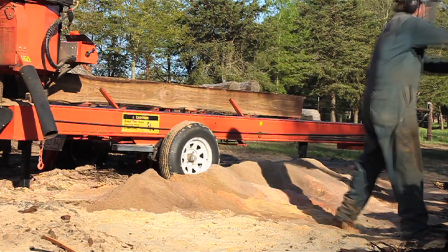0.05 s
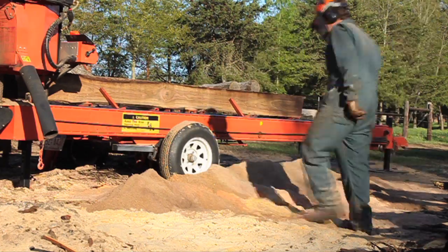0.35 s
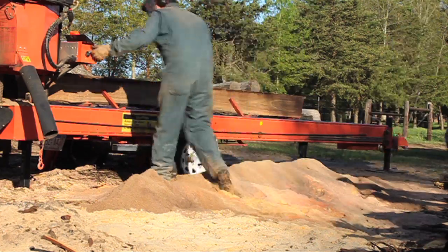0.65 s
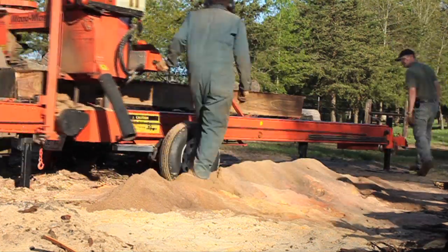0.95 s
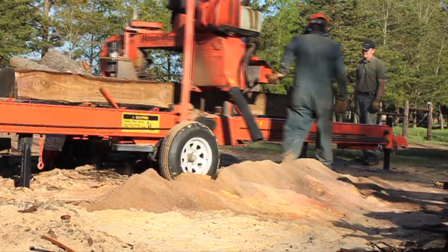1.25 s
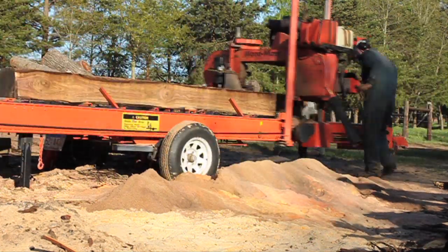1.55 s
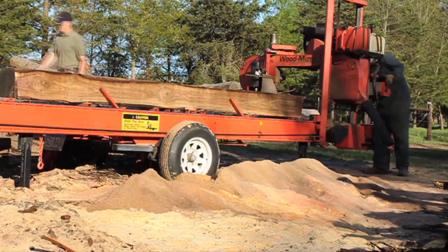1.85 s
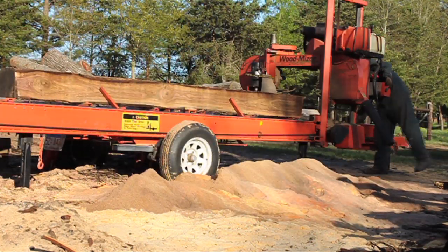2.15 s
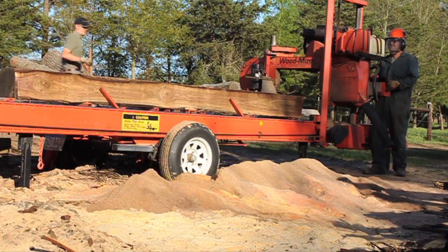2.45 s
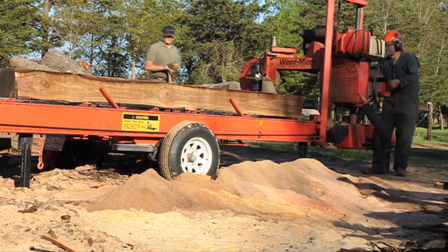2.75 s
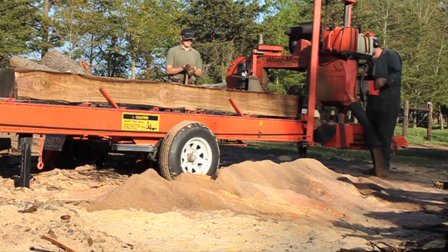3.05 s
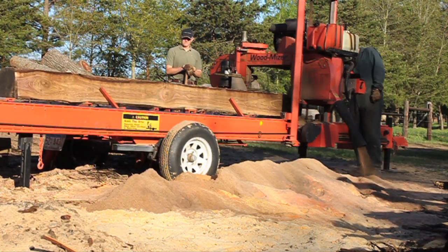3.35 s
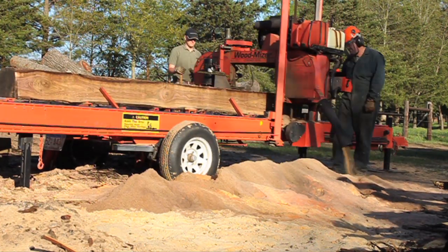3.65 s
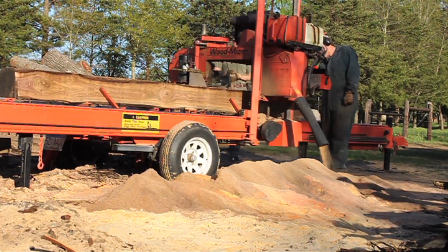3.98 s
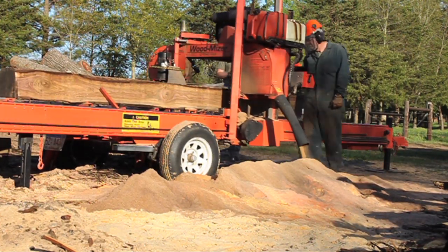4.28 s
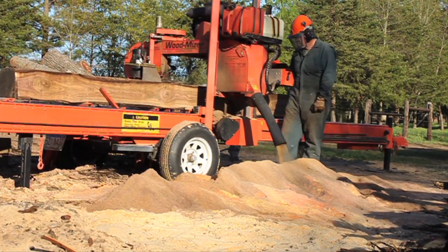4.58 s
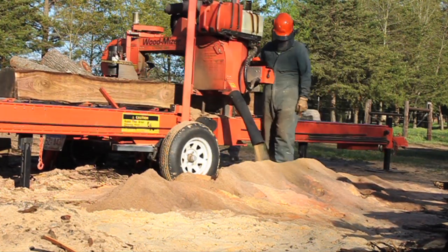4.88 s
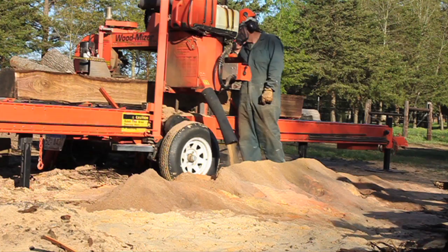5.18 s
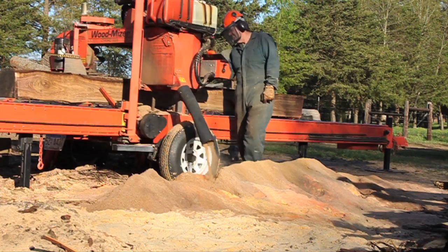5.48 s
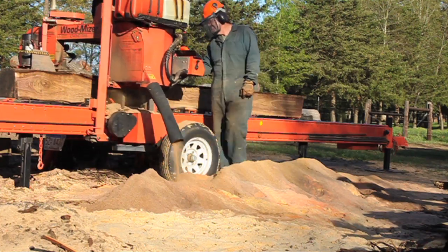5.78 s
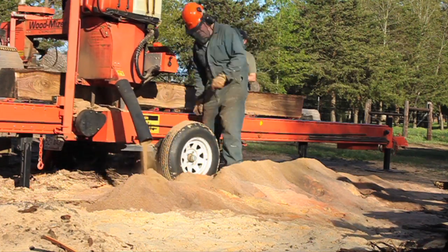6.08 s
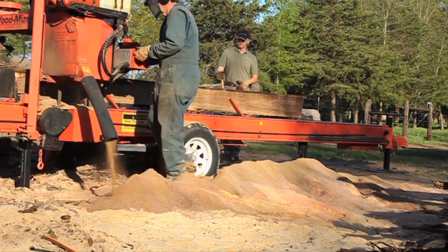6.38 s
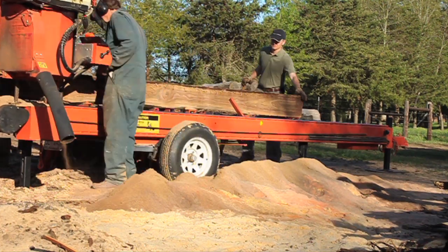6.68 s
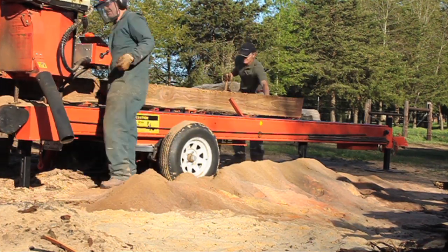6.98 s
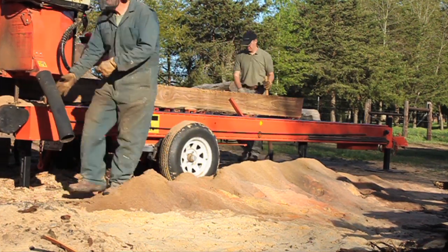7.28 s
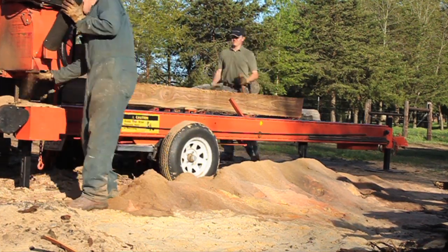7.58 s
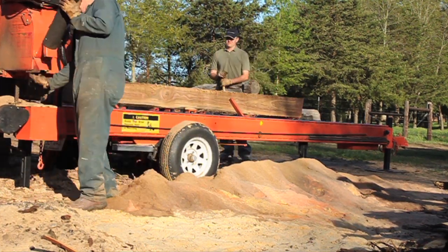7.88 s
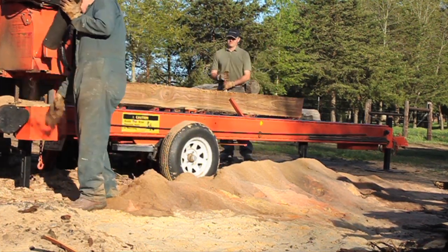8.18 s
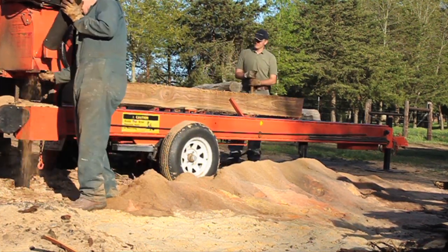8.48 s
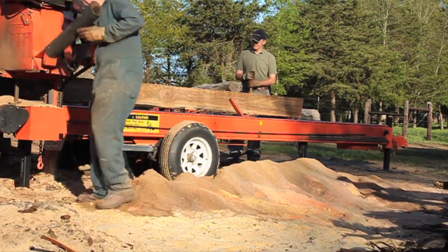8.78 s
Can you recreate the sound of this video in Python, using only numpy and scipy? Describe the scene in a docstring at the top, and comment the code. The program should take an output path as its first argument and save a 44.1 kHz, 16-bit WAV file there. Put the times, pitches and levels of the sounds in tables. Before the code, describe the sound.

Outdoors, a portable band sawmill runs quick and high, as if sped up. Its gas engine idles unevenly with a lumpy exhaust knock while loose steel clatters, jingles and squeals, and the saw head briefly rasps along its rail. A belt chirps, the engine jumps to a smooth drone and the blade hisses through a log. Then the engine flares and falls back to its rattling idle.

```python
"""Outdoors at a portable band sawmill, where everything runs quick and high, as if in fast motion.
The engine hunts at idle with a lumpy exhaust knock; loose steel clatters, jingles and squeals,
and the saw head rolls back along its rail. The belt chirps as it grips, the engine runs up to
a smooth drone while the teeth hiss through the log, then it flares and coasts back to idle."""
import sys
import numpy as np
from scipy import signal
from scipy.fft import rfft, irfft, next_fast_len
from scipy.io import wavfile
from scipy.ndimage import uniform_filter1d

SR = 44100
rng = np.random.default_rng(int(sys.argv[2]) if len(sys.argv) > 2 else 0)


def unload_audio(sound):
    """Save the sound as a 16-bit wav file, at the path given as the first command line argument."""
    columns = np.transpose(np.atleast_2d(sound))
    # keep every value between -1 and 1, then stretch to whole-number steps
    steps = np.round(np.clip(columns, -1, 1) * 32767)
    wavfile.write(sys.argv[1], SR, steps.astype(np.int16))


N = 389403
TIME = np.arange(N) / SR

# EQ curves for air, teeth, steel clatter and the exhaust with the head near and far: f/Hz, level/dB
AIR_EQ = [(30, -41), (200, -37), (500, -18), (1200, -7), (3000, 2), (7000, -2.5), (10000, -1),
          (12000, -1.5), (16000, -0.5)]
TEETH_EQ = [(250, -46), (1000, -36), (2000, -3.5), (2800, -5.5), (4200, 3), (6500, 2.5), (8200, 6.5),
            (9000, -0.5), (15000, -25)]
CLATTER_EQ = [(300, -44.5), (1180, -5.5), (1450, -1), (1700, 2), (2400, 2.5), (2950, -4.5), (3300, -6.5),
              (6000, -26), (15000, -31)]
KNOCK_NEAR_EQ = [(40, -91), (110, -49), (185, -27.5), (275, -15.5), (325, -10.5), (420, -4.5), (500, -1),
                 (600, 6), (780, -3), (960, -3.5), (1080, -16), (2200, -28)]
KNOCK_FAR_EQ = [(40, -83), (110, -53), (185, -28), (275, -19), (410, -6.5), (620, 2.5), (760, -1.5),
                (870, -11), (970, -6.5), (1080, -16), (2200, -37)]
# modes of the guards and of the blade's lower and upper ring: f/Hz, width/Hz, level/dB
GUARD_MODES = [(1670, 120, -6), (2780, 60, -6), (2940, 32, 0), (3900, 28, -5), (5060, 55, -10)]
BLADE_LOW_MODES = [(7620, 64, -7.5), (8000, 20, -13), (8090, 58, 0.5)]
BLADE_HIGH_MODES = [(9500, 150, -1), (9550, 100, 0)]
# fits of jingling, probably the slack blade: start t/s, end t/s, lower level/dB, upper level/dB
JINGLE_CUES = [(0.0, 0.91, -43.5, -42.5), (1.272, 1.616, -42.5, -50), (1.92, 2.02, -37.5, -58),
               (2.2, 2.27, -40, -50), (2.417, 2.833, -42, -59), (7.063, 7.5, -46.5, -44.5),
               (7.546, 8.21, -41, -43), (8.33, 8.43, -53, -50), (8.567, 8.812, -44, -46)]
# thin steel squeals: start t/s, end t/s, nominal f/Hz, level/dB
SQUEAL_CUES = [(0.01, 0.2, 2930, -43), (0.04, 0.11, 3900, -47), (0.22, 0.3, 5040, -48),
               (0.3, 0.87, 2950, -43), (0.78, 0.89, 5050, -48), (1.53, 1.61, 4200, -44),
               (1.73, 1.76, 3930, -45), (1.9, 2.04, 3950, -47), (2.13, 2.23, 2960, -44),
               (2.14, 2.2, 3920, -45), (2.23, 2.28, 5050, -44), (2.39, 2.44, 3680, -47),
               (2.47, 2.53, 3910, -44), (2.64, 2.76, 5060, -48), (7.42, 7.5, 3900, -42),
               (7.42, 8.2, 2950, -39), (7.58, 7.64, 5030, -45), (8.12, 8.2, 3910, -42),
               (8.7, 8.83, 2950, -40)]
# steel-on-steel hits: t/s, level/dB, f/Hz, t60/s
CLINK_CUES = [(0.195, -22, 3700, 0.034), (0.215, -22.5, 9300, .025), (0.929, -26, 4200, 0.019),
              (1.101, -23.5, 4800, 0.02), (6.8912, -33, 5125, 0.068), (6.891, -32, 1900, .05),
              (6.9393, -27.5, 6500, 0.015)]
# the glide of the gripping belt: t/s, f/Hz, level/dB
BELT_GLIDE = [(2.825, 6324, -60), (2.828, 9100, -20), (2.831, 9400, -25), (2.8335, 9700, -22),
              (2.837, 11640, -31), (2.848, 11800, -39), (2.86, 11900, -90)]
# the governor opens after a sag and the firings turn even: t/s, half length/s
GOVERNOR_CATCHES = [(1.177, 0.037), (1.295, 0.019), (1.536, 0.023), (1.874, 0.02), (7.023, .03),
                    (7.258, 0.037)]
# rough spurts of firing: t/s, level/dB, half length/s
SPURT_CUES = [(2.867, -46, 0.047), (2.942, -45, 0.0096), (3, -46, .014), (3.05, -43, 0.013),
              (6.61, -57, 0.039)]
# overtones the idling cylinders pump into the muffler: crank multiple, near level/dB, far level/dB
IDLE_CHORD = [(2, -20, -23.5), (4, -17.5, -16.5), (6, -33, -33), (8, -19.5, -16.5), (10, -21.5, -30),
              (12, -21, -23)]
# overtone balance in the run-up and early, midway and late in the cut: crank multiple, level/dB
RUN_UP_CHORD = [(2, -13), (6, -6.5), (8, 3), (12, 2.5), (14, -5.5), (36, -2.5)]
EARLY_CHORD = [(2, -5.5), (4, -4), (6, -10), (8, -2.5), (10, -6), (12, 2), (14, -9.5), (16, -5.5), (18, -5),
               (20, -15), (22, -2), (24, -1.5), (26, -8), (28, -10), (30, -3), (32, -5.5), (34, -20)]
MIDWAY_CHORD = [(2, -2), (4, -1), (6, -1), (8, 1), (10, -10), (12, -2.5), (14, -6), (18, -2), (22, -10),
                (24, -1.5), (26, -9), (30, -4), (34, -16), (36, -8)]
LATE_CHORD = [(2, -6), (4, -4), (6, -7), (8, -7), (10, -8), (12, -5.5), (14, -9), (16, -5), (18, 0),
              (20, -7), (22, -5), (24, -4.5), (26, -11), (36, -11)]
# faders for the sawing and for the low firing tone at open throttle: t/s, level/dB
SAW_FADER = [(2.85, -41), (2.905, -30), (2.98, -33.5), (4.6, -33.5), (5.05, -34.5), (5.5, -33),
             (6.2, -34.5), (6.53, -37.5), (6.62, -43), (6.8, -41)]
TONE_FADER = [(2.85, -48), (2.92, -39), (3.3, -43), (5.05, -44), (5.6, -43), (6.1, -45), (6.55, -50.5),
              (6.7, -47), (6.9, -54)]
# the crankshaft hunting at idle, and slowing in the cut where the wood resists: t/s, speed/(turns/s)
CRANK_IDLE = [(0.02, 92.1), (0.1, 89.3), (0.17, 92.3), (0.31, 87.5), (0.37, 95.7), (0.42, 91.6),
              (0.49, 92.8), (0.53, 90.4), (0.59, 91.3), (0.63, 95.4), (0.65, 94.8), (0.68, 88.7),
              (0.7, 88.1), (0.75, 92.2), (0.84, 93.0), (0.88, 88.9), (0.94, 92.8), (1.02, 88.2),
              (1.1, 95.2), (1.14, 87.6), (1.2, 93.2), (1.27, 86.8), (1.32, 93.6), (1.42, 93.5), (1.5, 87.5),
              (1.57, 94.9), (1.66, 91.5), (1.72, 96.3), (1.83, 86.5), (1.86, 88.4), (1.91, 96.5),
              (1.97, 91.3), (2.04, 89.3), (2.1, 93.5), (2.14, 91.2), (2.21, 93.7), (2.41, 92.1),
              (2.45, 95.2), (2.52, 91.7), (2.63, 92.3), (2.68, 95.3), (2.79, 91.9), (6.96, 87.5),
              (7.0, 89.3), (7.05, 96.9), (7.07, 97.4), (7.2, 86.7), (7.23, 89.1), (7.27, 95.5),
              (7.29, 96.2), (7.33, 91.7), (7.41, 89.7), (7.59, 92.8), (7.67, 87.9), (7.71, 93.3),
              (7.9, 90.3), (7.96, 93.7), (8.08, 91.8), (8.12, 94.8), (8.26, 87.2), (8.37, 92.2),
              (8.42, 89.7), (8.51, 93.6), (8.65, 88.9), (8.73, 93.6), (8.8, 89.7)]
CRANK_CUT = [(2.94, 184.7), (2.99, 169.0), (3.03, 187.5), (3.07, 179.6), (3.13, 182.7), (3.22, 172.1),
             (3.4, 176.1), (3.6, 173.1), (3.72, 176.4), (3.99, 174.3), (4.11, 176.9), (4.22, 174.0),
             (4.92, 174.0), (5.14, 168.1), (5.32, 170.2), (5.39, 166.3), (5.46, 167.9), (5.57, 178.8),
             (5.9, 178.6), (6.07, 175.7), (6.31, 179.2), (6.53, 176.8)]

RETURN_START_S, RETURN_END_S = 1.15, 1.62   # the head rolls to the far end of the log
THROTTLE_OPEN_S, RUN_UP_START_S, THROTTLE_SHUT_S = 2.83, 2.852, 6.55


def from_db(db):
    """Decibels to gain."""
    return 10 ** (np.asarray(db) / 20)


def rms_one(x):
    """Scale to rms 1."""
    return x / np.sqrt(np.mean(x ** 2) + 1e-20)


def levelled(x):
    """Ride the slow level to rms 1, whatever the pulse rate."""
    return x / np.sqrt(uniform_filter1d(x * x, SR // 8) + 1e-12)


def automation(rows):
    """Each column of a timed curve at every sample."""
    times, *columns = np.transpose(rows)
    return [np.interp(TIME, times, column) for column in columns]


def ramp(start_s, length_s):
    """A straight fade from 0 to 1."""
    return np.clip((TIME - start_s) / length_s, 0, 1)


def gate(start_s, end_s, edge_s=0.02):
    """1 between two times, with soft edges."""
    return ramp(start_s - edge_s / 2, edge_s) - ramp(end_s - edge_s / 2, edge_s)


def bump(at_s, half_s):
    """A bell curve of height 1."""
    return np.exp(-((TIME - at_s) / half_s) ** 2)


def noise():
    """White noise."""
    return rng.standard_normal(N)


def drift(rate, hop=40):
    """Smooth random modulation of rms 1 that changes about rate times a second."""
    pole = np.exp(-2 * np.pi * hop * rate / SR)
    white = rng.standard_normal(N // hop + 2002)
    slow = signal.lfilter([1], [1, -2 * pole, pole * pole], white)[2000:]
    return np.interp(np.arange(N) / hop, np.arange(len(slow)), rms_one(slow))


def colour(x, eq):
    """Minimum-phase EQ, so hits do not pre-ring; rms 1."""
    size = next_fast_len(N + SR // 2, True) // 2 * 2
    hz, db = np.transpose(eq)
    bin_hz = np.arange(size // 2 + 1) * SR / size
    gain = from_db(np.interp(np.log(bin_hz + 1), np.log(hz), db))
    cepstrum = irfft(np.log(gain))
    cepstrum[1:size // 2] *= 2
    cepstrum[size // 2 + 1:] = 0
    return rms_one(irfft(rfft(x, size) * np.exp(rfft(cepstrum)))[:N])


def resonate(x, hz, width_hz):
    """One resonance with unity gain at its peak."""
    r = np.exp(-np.pi * width_hz / SR)
    feedback = [1, -2 * r * np.cos(2 * np.pi * hz / SR), r * r]
    return signal.lfilter(np.array([1, 0, -1]) * (1 - r * r) / 2, feedback, x)


def strokes(cycles, scatter_db, accents_db=(0,)):
    """One click a cycle, with repeating accents and random scatter in level."""
    at = np.flatnonzero(np.diff(np.floor(cycles)) > 0)
    clicks = np.zeros(N)
    clicks[at] = from_db(np.resize(accents_db, len(at)) + scatter_db * np.clip(noise()[:len(at)], -2, 2))
    return clicks


def puffs(clicks, decay_s):
    """Each click lets out a dying puff of noise."""
    return noise() * signal.lfilter([1], [1, -np.exp(-1 / (decay_s * SR))], clicks + 1e-18)


def sine(cycles, multiple=1):
    """A sine of rms 1 locked to a cycle count; different multiples peak out of step."""
    return np.sqrt(2) * np.sin(2 * np.pi * multiple * cycles + multiple ** 2)


def air_and_teeth(turn, air_db, teeth_db, throb=0.13):
    """A bed of airy hiss; the running teeth add a bright rasp that throbs once a turn."""
    air = from_db(air_db + .5 * drift(21)) * colour(noise(), AIR_EQ)
    teeth = noise() * (1 + throb * np.sin(2 * np.pi * turn)) * from_db(1.6 * drift(30))
    return air + from_db(teeth_db) * colour(teeth, TEETH_EQ)


def blade_squeals(flutter_db=2, detune=0.99):
    """Thin, fluttering squeals come and go, probably the blade in its guides."""
    wavering_time = np.cumsum(1 + .003 * drift(8) + .0065 * drift(120)) / SR
    squeals = sum(from_db(db) * gate(start, end) * sine(hz * wavering_time, detune)
                  for start, end, hz, db in SQUEAL_CUES)
    return squeals * from_db(flutter_db * drift(23))


def clinks(width_hz=2500):
    """Short, bright knocks of steel on steel."""
    hits = np.zeros(N)
    for at_s, db, hz, t60 in CLINK_CUES:
        age = TIME - at_s
        envelope = from_db(db - 60 * np.clip(age / t60, 0, 2)) * (age >= 0)
        hits += envelope * rms_one(resonate(noise(), hz, width_hz))
    return signal.sosfilt(signal.butter(2, 800, "high", fs=SR, output="sos"), hits)


def head_return(rolling_db=-38, squeal_db=-42, squeal_hz=3686, rise_hz_per_s=760):
    """The carriage rolls back along its rail with a rasp and a rough, rising friction squeal."""
    rolling = colour(noise(), TEETH_EQ) + colour(noise(), CLATTER_EQ)
    glide_hz = squeal_hz + rise_hz_per_s * (TIME - (RETURN_START_S + RETURN_END_S) / 2)
    waver = 1 + .012 * drift(5) + .03 * drift(205)
    squeal = sine(np.cumsum(glide_hz * waver) / SR)
    carriage = from_db(rolling_db) * rolling + from_db(squeal_db) * squeal
    return gate(RETURN_START_S, RETURN_END_S) * carriage


def rattle(turn, modes):
    """Shaken once a turn, thin steel rings in its modes, their balance wandering."""
    shake = puffs(strokes(turn, scatter_db=3.5), decay_s=0.014)
    steel = 0
    for hz, width_hz, db in modes:
        ringing = resonate(resonate(shake, hz, width_hz), hz, 8 * width_hz)
        steel += from_db(db + 2.2 * drift(5)) * ringing
    return levelled(steel)


def clatter(turn, wash_db=-6, tick_db=-11, frame_hz=2050):
    """Slack steel parts slap together once a turn, with three lighter ticks between."""
    loose_turn = turn + .005 * drift(40)
    slaps = strokes(4 * loose_turn, scatter_db=.6, accents_db=[0, tick_db, tick_db, tick_db])
    for hz in (frame_hz, frame_hz, 2 * frame_hz):
        slaps = 2 * resonate(slaps, hz, width_hz=1100) - slaps   # all-pass: the frame smears each slap
    return levelled(colour(rms_one(slaps) + from_db(wash_db) * noise(), CLATTER_EQ))


def exhaust_knock(turn, far, knock_db=-31, puff_db=-9, ring_db=-48, ring_hz=972.6, repeat_chance=.2):
    """Two cylinders pump a chord and chug as each fires and misses by turns; the muffler rings."""
    turn = turn + .3 + .003 * drift(30)
    firings = strokes(2 * turn, scatter_db=.8)
    at = np.flatnonzero(firings)
    flips = rng.random((N // 100, 2)) > repeat_chance   # now and then a cylinder does the same twice
    fired = (np.cumsum(flips, axis=0) % 2).ravel()[:len(at)]
    caught = sum(bump(at_s, half_s) for at_s, half_s in GOVERNOR_CATCHES)[at] > np.exp(-1)
    firings[at] *= np.maximum(fired, caught) - .5   # above or below the mean push
    gas = rms_one(firings) + from_db(puff_db) * noise()
    distance_db = -2
    muffler = resonate(resonate(gas, ring_hz, width_hz=22), ring_hz, width_hz=60)
    ring = from_db(ring_db + distance_db * far) * levelled(muffler)
    for k, near_db, far_db in IDLE_CHORD:
        pumping = np.sqrt(2) * np.cos(2 * np.pi * k * turn + 5.8 / k)   # low overtones lead the firings
        gas += from_db(near_db + far * (far_db - near_db) + drift(30)) * pumping
    thump = (1 - far) * colour(gas, KNOCK_NEAR_EQ)
    thump += far * from_db(distance_db) * colour(gas, KNOCK_FAR_EQ)
    return from_db(knock_db) * thump + ring


def idling_mill(turn, opened, low_rest_db=-51.5, high_rest_db=-54.5, swell_db_per_s=23.5):
    """Knock, clatter, jingle and fan air; all but the blade sit back while the head stands far off."""
    far = ramp(RETURN_START_S, RETURN_END_S - RETURN_START_S) * (TIME < THROTTLE_SHUT_S)
    firing = 1 - opened + ramp(6.82, 0.089)   # hardly any knock while it coasts
    engine = firing * exhaust_knock(turn, far)
    metal = from_db(-32.5 - 2.5 * far) * clatter(turn)
    metal += from_db(-38.5 - 4 * far) * rattle(turn, GUARD_MODES)
    # each fit of jingling lifts the blade above its resting level, and the hiss a little with it
    low_lift_db = sum((db - low_rest_db) * gate(start, end) for start, end, db, _ in JINGLE_CUES)
    high_lift_db = sum((db - high_rest_db) * gate(start, end) for start, end, _, db in JINGLE_CUES)
    blade = from_db(low_rest_db + low_lift_db) * rattle(turn, BLADE_LOW_MODES)
    blade += from_db(high_rest_db + high_lift_db) * rattle(turn, BLADE_HIGH_MODES)
    hiss = air_and_teeth(turn, air_db=-34 - 3 * far + .21 * low_lift_db, teeth_db=-42 + .17 * low_lift_db)
    dip = from_db(-6 * bump(1.12, .018))   # the level ducks briefly after one clink
    swell_back = ramp(THROTTLE_SHUT_S, 0.037) * from_db(-swell_db_per_s * np.maximum(7.418 - TIME, 0))
    return (1 - opened + swell_back) * dip * (engine + metal + blade + hiss)


def belt_chirp(wobble=0.02):
    """A rough squeal that slides upward as the belt takes hold."""
    hz, db = automation(BELT_GLIDE)
    squeal = sine(np.cumsum(hz * (1 + wobble * drift(340))) / SR)
    return from_db(db) * squeal * (TIME > BELT_GLIDE[0][0]) * (TIME < BELT_GLIDE[-1][0])


def firing_spurts(turn):
    """While its speed changes the engine fires in rough spurts."""
    envelope = sum(from_db(db) * bump(at_s, half_s) for at_s, db, half_s in SPURT_CUES)
    exhaust = puffs(strokes(2 * turn, scatter_db=1), decay_s=0.0046)
    return envelope * colour(exhaust, KNOCK_NEAR_EQ)


def blade_shriek(turn, level_db=-45, laps_per_turn=.147):
    """In the first half of the cut a rough shriek rides the engine's pitch, flaring on each band lap."""
    flare = .5 + .5 * np.sin(2 * np.pi * laps_per_turn * turn + .5 * drift(10))
    shriek = sine(turn + .007 * drift(90), multiple=36.15)
    return gate(3.3, 4.92) * from_db(level_db + 2 * drift(10)) * rms_one(flare) * shriek


def engine_drone(turn, tone_db, buzz_db):
    """Under load the firings merge into a chord whose colour shifts as the saw head travels past."""
    turn = turn + .0018 * drift(45)
    settled, midway, late = ramp(3.04, 0.28), ramp(4.8, 0.42), ramp(5.5, 0.054)
    crossfades = [(1 - settled, RUN_UP_CHORD), (settled - midway, EARLY_CHORD),
                  (midway - late, MIDWAY_CHORD), (late, LATE_CHORD)]
    # the eighth overtone swells to a whine mid-cut; the twelfth sings briefly near the end
    swells_db = {8: 4.5 * ramp(4.2, 0.38) * (1 - midway), 12: 8 * bump(6.09, .15)}
    tone, buzz = 0, 0
    for k in range(2, 37):
        is_low = k <= 5
        db = sum(fade * np.interp(k, *np.transpose(chord), right=-14) for fade, chord in crossfades)
        if k % 2:   # firings nearly alike: odd overtones stay weak
            db -= 7 * settled + 42 / k + 6 * is_low
        waver_db = min(k / 12, 1.7) * drift(4 + k / 2)   # high overtones waver most
        overtone = from_db(db + waver_db + swells_db.get(k, 0)) * sine(turn, k)
        if is_low:
            tone += overtone
        else:
            buzz += overtone
    # the small muffler radiates little bass, so the lowest overtone fades as the engine slows
    tone = signal.sosfilt(signal.butter(6, 315, "high", fs=SR, output="sos"), tone)
    return from_db(tone_db) * levelled(tone) + from_db(buzz_db) * levelled(buzz)


def sawing_mill(turn, opened):
    """The engine drones, the teeth tear the wood and sawdust sprays; the buzz drops as the load goes."""
    saw_db, = automation(SAW_FADER)
    tone_db, = automation(TONE_FADER)
    unloaded = ramp(THROTTLE_SHUT_S, 0.062)
    engine = engine_drone(turn, tone_db, buzz_db=saw_db - 2.5 - 6 * unloaded)
    side_tone = from_db(-61) * sine(turn, multiple=4.57) * gate(RUN_UP_START_S, 5.53)   # likely a pulley
    wood = air_and_teeth(turn, air_db=saw_db, teeth_db=saw_db - 4.5) * (1 - ramp(6.68, 0.15))
    return opened * (1 - ramp(6.86, 0.1)) * (engine + side_tone + wood + blade_shriek(turn))


def crank_speed():
    """Turns per second: a hunting idle, a run-up, the cut, a flare once unloaded and a coast down."""
    idle, = automation(CRANK_IDLE)
    cutting, = automation(CRANK_CUT)
    flare = 16 * bump(6.595, 0.036)
    coast = (1 - ramp(6.635, .285)) ** 1.6
    revved = ramp(RUN_UP_START_S, .078) * coast
    return idle + revved * (cutting + flare - idle)


def scene():
    """The crankshaft clocks engine, rattles and teeth; the throttle switches from idle to drone."""
    turn = np.cumsum(crank_speed()) / SR
    opened = ramp(THROTTLE_OPEN_S, 0.0019)
    mill = idling_mill(turn, opened) + sawing_mill(turn, opened) + firing_spurts(turn)
    mill += head_return() + blade_squeals() + clinks() + belt_chirp()
    return np.array([mill, mill])


def record(dry, cutoff_hz=15800):
    """A steep high cut on both channels."""
    hz = np.arange(N + 1) * SR / (2 * N)
    return irfft(rfft(dry, 2 * N) / np.sqrt(1 + (hz / cutoff_hz) ** 400))[:, :N]


dry = scene()
out = record(dry)
unload_audio(out)
```